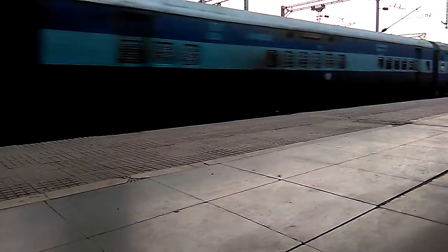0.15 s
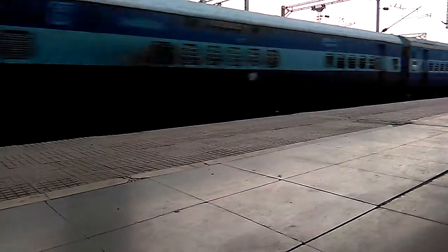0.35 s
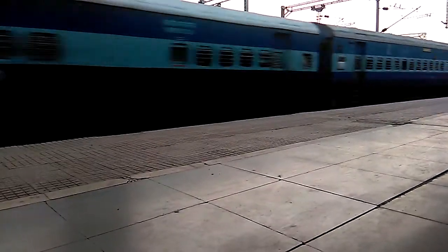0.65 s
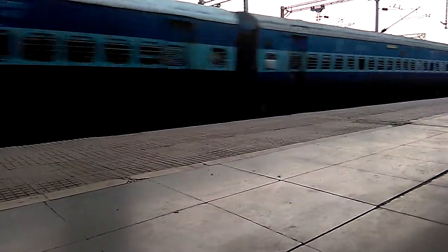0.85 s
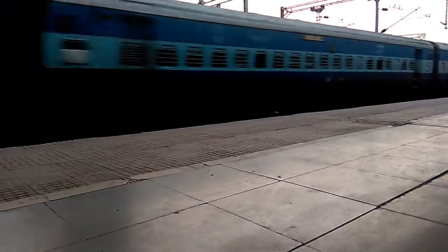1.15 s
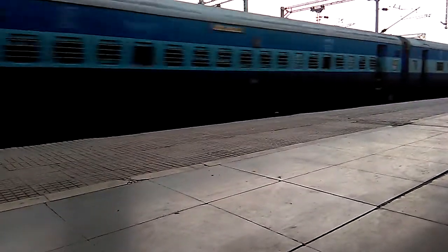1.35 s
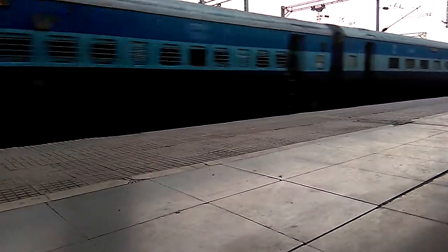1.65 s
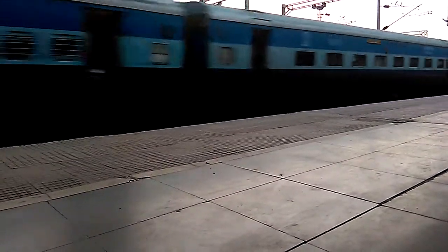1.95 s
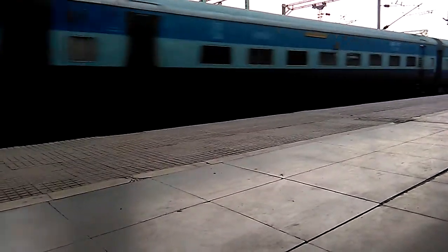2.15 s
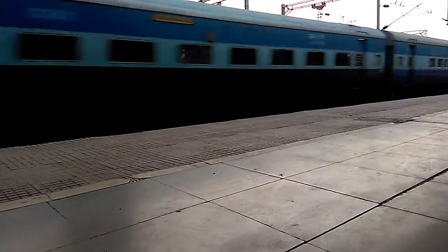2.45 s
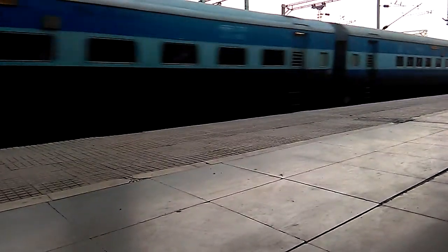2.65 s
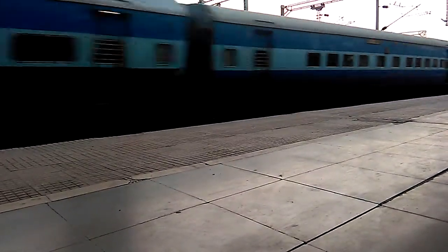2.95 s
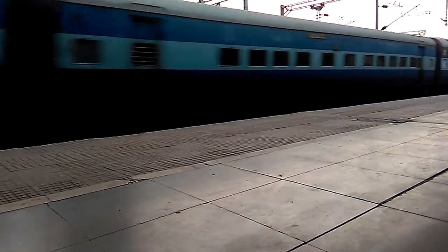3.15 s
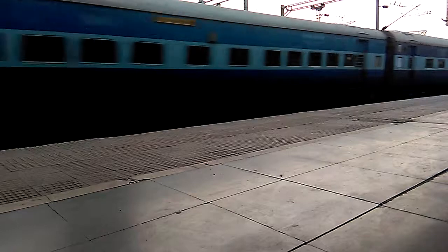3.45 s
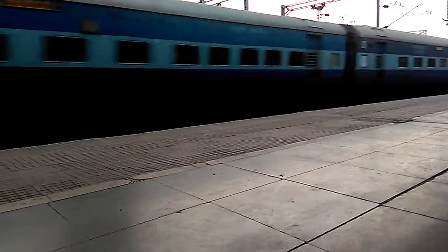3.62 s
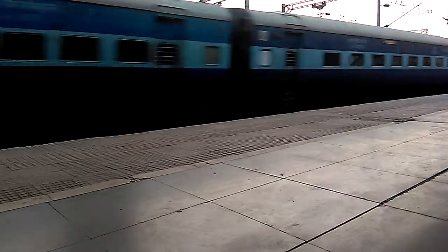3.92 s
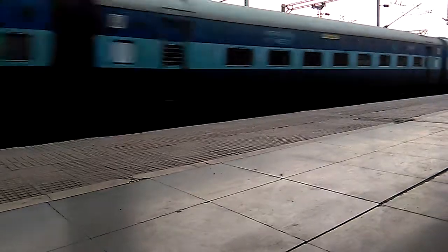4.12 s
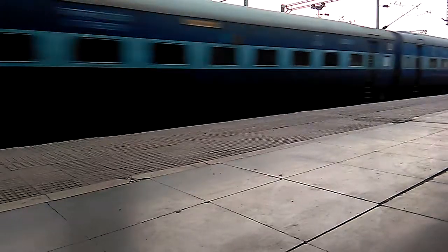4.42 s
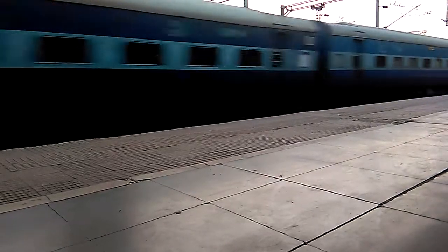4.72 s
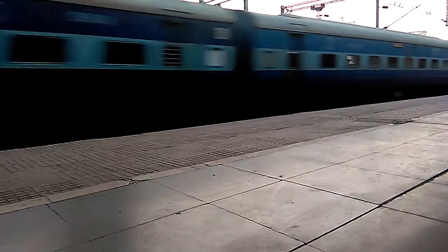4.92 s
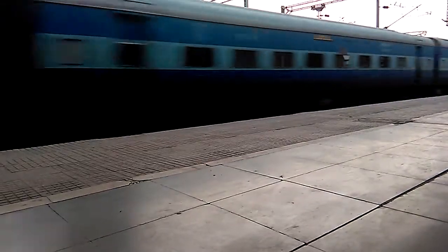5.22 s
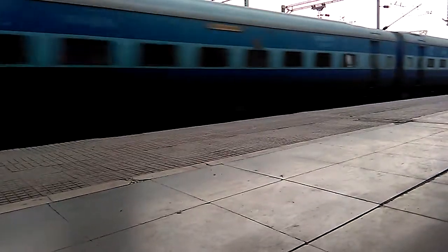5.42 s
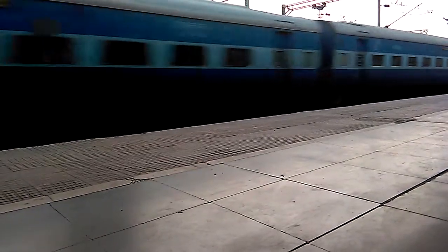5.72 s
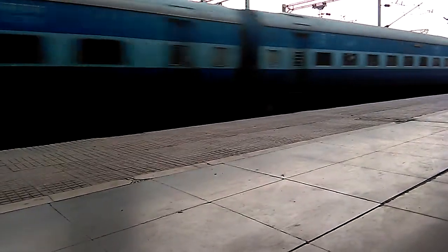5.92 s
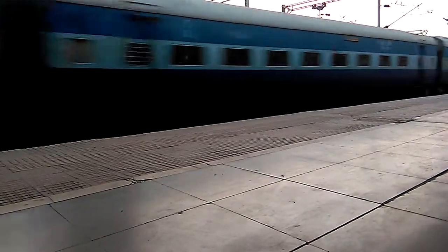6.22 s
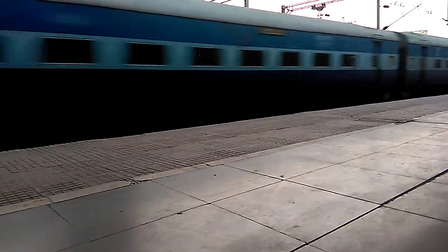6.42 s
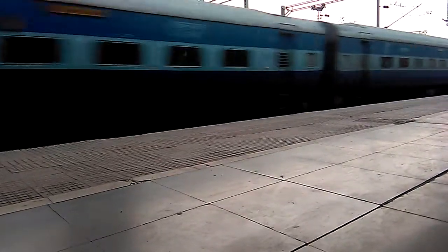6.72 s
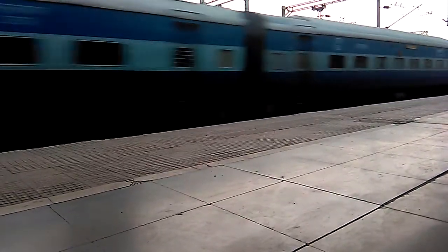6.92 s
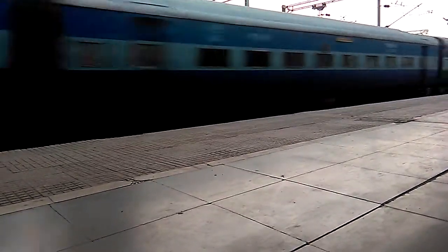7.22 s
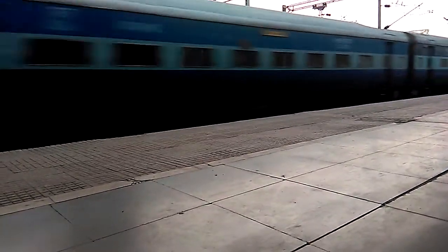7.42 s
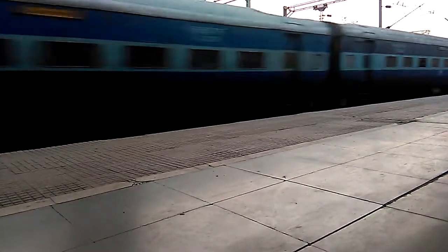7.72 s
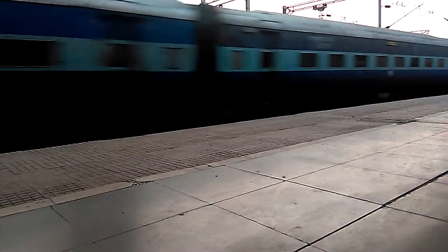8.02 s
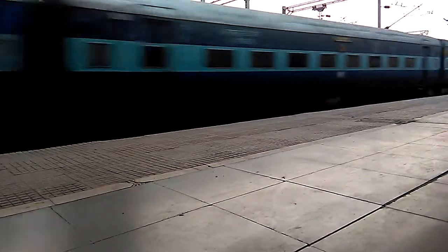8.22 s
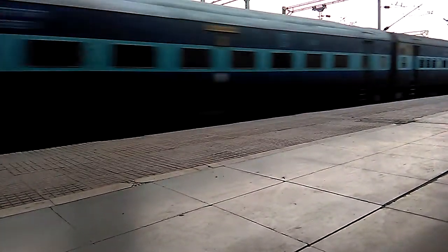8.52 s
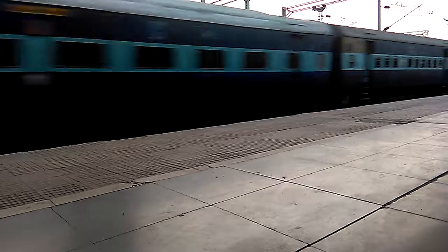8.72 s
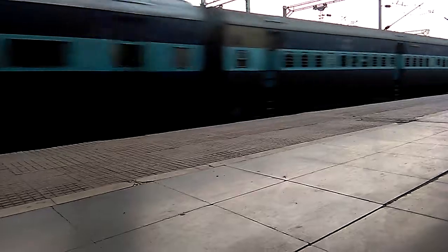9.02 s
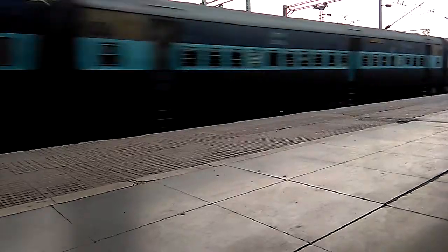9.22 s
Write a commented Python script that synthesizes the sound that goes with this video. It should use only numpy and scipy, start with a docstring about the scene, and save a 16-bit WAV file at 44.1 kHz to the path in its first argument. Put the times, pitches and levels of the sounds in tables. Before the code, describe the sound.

A passenger train is already rushing past a platform at 0 s, heard close and fairly dry, at constant speed. Four wheel blows strike a rail joint in two pairs within about half a second; groups begin near 0.45, 1.45, 2.5, 3.5, 4.5, 5.5, 6.5, 7.5 and 8.55 s. Each blow is a woody, metallic knock with a shudder, bright airy hiss and thin steel ringing. Between groups it falls back to low rumble and fainter hiss. Heavy roaring, clattering bursts hit at 0.6 to 1, 3.6 to 4.1, 4.5 to 4.8, 6.7 to 7.1, 7.7 to 8.1 and 8.7 to 9.1 s, while groups near 1.5, 2.5 and 5.5 s are cleaner. A fluttering mid-pitched wheel hum swells from 3.1 s, peaks near 3.9 and sinks away by 4.4, where rumble stays fuller and loose gear clinks. Rolling continues to the end.

```python
"""Passenger train passing a platform

A train runs past a station platform close to the microphone, one coach a second.
Its wheels cross a rail joint in fours (two bogies of two axles): decaying tones and shaped noise
make each knock, hiss and ring. Loud roaring bursts layer low boom, body and bright clatter noise.
Rolling noise fills the gaps, loose gear knocks, and one wheel hums as a fluttering, sinking sine."""
import sys
import numpy as np
from scipy import signal
from scipy.fft import rfft, irfft, next_fast_len
from scipy.io import wavfile
from scipy.ndimage import uniform_filter1d, map_coordinates

SR = 44100
rng = np.random.default_rng(int(sys.argv[2]) if len(sys.argv) > 2 else 0)


def persist_wave(psi):
    """Save psi, clipped to +-1, as 16-bit WAV."""
    counts = np.round(np.clip(psi, -1, 1) * 32767).astype(np.int16)
    wavfile.write(sys.argv[1], SR, np.atleast_2d(counts).T)


N = 412776


def amp(db):
    """Decibels to gain."""
    return 10 ** (np.asarray(db) / 20)


def unit(x):
    """Scale to rms 1."""
    return x / np.sqrt(np.mean(x ** 2) + 1e-20)


def along(points, hz):
    """Read (frequency, value) points on a log frequency axis."""
    f, v = np.transpose(points)
    return np.interp(np.log(hz + 1), np.log(f), v)


def curves(rows):
    """One value per sample for each column after the time."""
    s, *cols = np.transpose(rows)
    return [np.interp(np.arange(N) / SR, s, c) for c in cols]


def wobble(rate):
    """A smooth random curve, rate knots a second."""
    knots = rng.standard_normal(int(N * rate / SR) + 4)
    return map_coordinates(knots, [np.arange(N) * rate / SR])


def filtered(x, response):
    """x times a response of frequency."""
    m = next_fast_len(N + SR // 2)
    return irfft(rfft(x, m) * response(np.fft.rfftfreq(m, 1 / SR)), m)[..., :N]


def add(track, s, sound):
    """Mix a sound into a track at time s."""
    at = round(s * SR) + np.arange(len(sound))
    inside = (at >= 0) & (at < N)
    track[at[inside]] += sound[inside]


def strike(t, rise, t60):
    """Envelope that swells and then dies away, peak 1."""
    shape = (1 - np.exp(-(t / rise) ** 2)) * amp(-60 * t / t60)
    return shape / shape.max()


# side level of the noise layers, wide only in the treble: frequency_hz, side_level_db (against mid)
WIDTH = [(3700, -90), (4250, -47), (5200, -30), (6000, -12), (7500, -6), (11800, -7), (13000, -15),
         (14200, -12)]


def rush(spectrum, grain_db=0, grain_rate=300, patchy_db=0):
    """Stereo noise, mid rms 1: contacts of uneven force excite short-lived resonances under a broad colour."""
    force = rng.standard_normal((2, N)) * amp(grain_db * wobble(grain_rate))
    z = signal.stft(force, nperseg=512)[2]
    # random patches, smoothed over frequency and then time
    patches = uniform_filter1d(rng.standard_normal(z.shape[1:]), size=2, axis=0)
    patches = uniform_filter1d(patches, size=9, axis=1)
    force = signal.istft(z * amp(patchy_db * unit(patches)), nperseg=512)[1][:, :N]
    mid, side = filtered(force, lambda hz: amp(along(spectrum, hz)))
    side = filtered(side, lambda hz: amp(along(WIDTH, hz)))
    return np.array([mid + side, mid - side]) / np.std(mid)


# four axles around each coupling: first_axle_s, knock_db, hiss_db, earshot_s (time a wheel stays in earshot)
COUPLINGS = [(-.563, -5, -2.5, 0.36), (.451, 1, -1, 0.26), (1.463, 0, -1, 0.35), (2.473, 0.5, -0.5, 0.21),
             (3.486, 2.5, -1, 0.21), (4.497, 0, -0.5, 0.21), (5.508, -0.5, .5, 0.19),
             (6.521, 1.5, .5, 0.22), (7.532, 2.5, -0.5, .2), (8.551, .5, -.5, 0.2)]
# the four axles in order, added to their coupling's levels: knock_db, hiss_db, steel_ring_db
AXLES = [(-23.5, -27.5, -51), (-25.5, -27.5, -39), (-23, -28, -49), (-23, -27.5, -45)]
# wheels that hit harder than their fellows: start_s, extra_knock_db, extra_ring_db, ring_centre_hz
HARD_BLOWS = [(-.06, 2, 12, 9100), (.586, 9, 8, 5800), (.922, 9.5, -9, 5730), (2.61, 3, -1, 9100),
              (3.619, 1.5, 5.5, 5800), (3.968, 1, 17.5, 9100), (4.625, 14, -20, 5800), (5.642, 1, 1, 5800),
              (6.655, 5.5, 4, 9100), (6.987, 10.5, 12, 8900), (7.667, 9, 10.5, 9100),
              (8.008, 7, 14.5, 9000), (8.68, 5, 11, 5740), (9.024, 14, 6, 5800)]
# identical coaches at a steady speed
SPEED_M_PER_S, WHEELBASE_M, BOGIE_GAP_M = 22.0, 2.97, 7.46
HARD_WITHIN_S = 0.04  # an axle this near a hard blow takes its time and extra levels
RING_SPREAD_OCTAVES = 0.46  # how far around its centre a hard blow rings the steel


def wheels():
    """Axle spacing over speed times every joint crossing: start_s, knock_db, hiss_db, mode_dbs, earshot_s."""
    delays = np.array([0, WHEELBASE_M, BOGIE_GAP_M, BOGIE_GAP_M + WHEELBASE_M]) / SPEED_M_PER_S
    mode_hz, mode_db = np.transpose(STEEL)
    rows = []
    for first, group_knock_db, group_hiss_db, earshot in COUPLINGS:
        for s, (knock_db, hiss_db, ring_db) in zip(first + delays, AXLES):
            for at, hard_db, bright_db, centre_hz in HARD_BLOWS:
                if abs(at - s) < HARD_WITHIN_S:
                    octaves = np.log2(mode_hz / centre_hz)
                    share = 1 / (1 + (octaves / RING_SPREAD_OCTAVES) ** 2)
                    s, knock_db, ring_db = at, knock_db + hard_db, ring_db + bright_db * share
            knock_db, hiss_db = knock_db + group_knock_db, hiss_db + group_hiss_db
            rows.append((s, knock_db, hiss_db, ring_db + mode_db, earshot))
    return rows


# rail and sleeper under a blow: pitch_hz, leading_axle_db, trailing_axle_db (against the knock), t60_s
RAIL = [(377.7, -4, -7, 0.09), (537.6, -16.5, -6.5, 0.16), (695, -5, 2, 0.032), (883, -10, -12, 0.058),
        (1157, -27, -14.5, 0.046), (2050, -34, -19.5, 0.042)]
# colour of the shudder, also of rough edges on loose gear: frequency_hz, relative_density_db
KNOCK = [(20, -45), (40, -12.5), (100, -3), (250, -8.5), (380, 7), (580, -5.5), (800, 0.5), (1100, -11),
         (1600, -17), (2200, -13), (3200, -23), (4400, -20), (5500, -49), (9000, -70)]


def clacks(crossings):
    """Each wheel drops into the joint: the rail rings briefly and the track shudders."""
    t = np.arange(SR // 2) / SR
    ring, shudder = np.zeros((2, N))
    for axle, (s, db, *_) in enumerate(crossings):
        for hz, leading_db, trailing_db, t60 in RAIL:
            size, detune, phase = rng.standard_normal(3)
            level_db = db + (trailing_db if axle % 2 else leading_db) + 3.5 * size
            tone = np.sin(2 * np.pi * (hz * (1 + 0.035 * detune) * t + phase))
            # high bending waves travel faster in a rail and arrive first
            lag = 0.025 * (np.sqrt(700 / hz) - 1)
            add(ring, s + lag, amp(level_db) * strike(t, rise=0.0067, t60=t60) * tone)
        # overlapping noise adds as power
        add(shudder, s - 0.01, (amp(db) * strike(t, rise=0.024, t60=0.39)) ** 2)
    return ring + amp(-7.5) * np.sqrt(shudder) * rush(KNOCK, patchy_db=3.5)


# high ringing modes of the wheel steel: pitch_hz, level_db (against the axle's steel ring)
STEEL = [(5819, 3.5), (6573, -3.5), (8366, -9), (9119, 2.5), (11235, -6.5), (12758, -36)]
# colour of the wheel scrubbing on the rail head: frequency_hz, relative_density_db
HISS = [(2000, -70), (4000, -11), (5200, -12.5), (6000, -2.5), (7700, 1.5), (9800, -0.5), (11000, -5.5),
        (12600, -3.5), (13300, -20), (14300, -13)]


def wheel_hiss(crossings):
    """The jolted wheel scrubs on the rail head and its steel modes ring, at new strengths for every blow."""
    t = np.arange(SR // 2) / SR
    scrub, ringing = np.zeros(N), np.zeros((len(STEEL), N))
    for s, _, hiss_db, modes_db, earshot in crossings:
        # the wheel runs out of earshot behind the platform edge
        leaving = np.exp(-(t / earshot) ** 4)
        scrub_shape = strike(t, rise=0.022, t60=1.0) * leaving
        ring_shape = strike(t, rise=0.02, t60=0.36) * leaving
        add(scrub, s - 0.011, (amp(hiss_db - 4.5) * scrub_shape) ** 2)
        for mode, db in zip(ringing, modes_db):
            level_db = db + 1.5 * rng.standard_normal()
            add(mode, s + 0.003, (amp(level_db) * ring_shape) ** 2)
    time = np.arange(N) / SR
    steel = np.zeros(N)
    for mode, (hz, _) in zip(ringing, STEEL):
        # the turning wheel makes each mode beat and waver
        beating = amp(3.5 * wobble(45))
        steel += np.sqrt(mode) * beating * np.sin(2 * np.pi * hz * time + 1.15 * wobble(70))
    hiss = np.sqrt(scrub) * rush(HISS, grain_db=1, grain_rate=400, patchy_db=2.2)
    return hiss + amp(1.5) * steel


def held(t, length, rise, sag_db, t60):
    """Envelope that rises, tilts down by sag_db over its length (up if negative) and then dies away."""
    after = np.maximum(t - length, 0)
    sag = np.minimum(t / length, 1) - 0.5
    return (1 - np.exp(-t / rise)) * amp(-sag_db * sag - 60 * after / t60)


# loud roaring bursts: start_s, length_s, strength_db, boom_db
ROAR_BURSTS = [(-.02, 0.096, -1, -22.5), (0.574, .18, 1, -19), (0.809, 0.11, 2.5, -22.5),
               (0.924, .095, 2.5, -26), (3.63, .11, 1, -21.5), (3.876, 0.039, 2.5, -24.5),
               (3.963, 0.12, 3, -19.5), (4.513, 0.12, 2, -23.5), (4.575, 0.18, 3.5, -19),
               (6.672, 0.082, -2.5, -30.5), (6.889, 0.094, -1, -23.5), (6.979, 0.12, 1.5, -31.5),
               (7.662, 0.12, -0.5, -25), (7.927, 0.048, -1, -19.5), (7.998, 0.1, 0, -30),
               (8.694, .11, -.5, -26.5), (8.922, 0.072, -2, -23.5), (9.003, .12, 1, -25)]
# colours of the three layers, each: frequency_hz, relative_density_db
BOOM = [(20, -44), (40, -40), (60, -11), (95, 0.5), (220, -0.5), (300, -14), (450, -31), (1000, -100)]
BODY = [(40, -60), (150, -45), (270, -1), (370, 0.5), (510, -2.5), (600, -6.5), (760, -5.5), (1000, -13.5),
        (1400, -29.5), (3000, -90)]
CLATTER = [(100, -70), (600, -24), (1100, -0.5), (1500, -4), (1900, -2), (2400, -2.5), (3200, -6.5),
           (3900, -6), (4350, -3.5), (5000, -8), (6500, -10.5), (8000, -25), (11000, -31.5), (14000, -39)]
BODY_DB, CLATTER_DB = -17, -21.5  # at strength 0
CLATTER_GROWS = 0.26  # dB per dB of strength: louder bursts are deeper


def roar_bursts():
    """Loud roaring bursts: boom and body rise fast, the bright clatter more slowly."""
    t = np.arange(SR // 2) / SR
    boom, body, clatter = np.zeros((3, N))
    for s, length, db, boom_db in ROAR_BURSTS:
        boom_shape = held(t, length, rise=0.01, sag_db=-1.0, t60=0.22)
        body_shape = held(t, length, rise=0.01, sag_db=4.0, t60=0.2)
        clatter_shape = held(t, length, rise=0.025, sag_db=7, t60=0.22)
        add(boom, s, (amp(boom_db) * boom_shape) ** 2)
        add(body, s, (amp(db) * body_shape) ** 2)
        add(clatter, s - 0.003, (amp(CLATTER_GROWS * db) * clatter_shape) ** 2)
    boom_noise = rush(BOOM, patchy_db=4.5)
    body_noise = rush(BODY, grain_db=0.85, grain_rate=220, patchy_db=3.0)
    clatter_noise = rush(CLATTER, grain_db=1.5, grain_rate=350, patchy_db=2.7)
    return (np.sqrt(boom) * boom_noise
            + amp(BODY_DB) * np.sqrt(body) * body_noise
            + amp(CLATTER_DB) * np.sqrt(clatter) * clatter_noise)


# the humming wheel swells, comes closest, then fades and sinks in pitch
HUM_START_S, HUM_CLOSEST_S, HUM_END_S = 3.08, 3.92, 4.38
HUM_HZ, HUM_SAG_HZ_PER_S = 515, 45
HUM_DB, HUM_SWELL_DB_PER_S, HUM_FADE_DB_PER_S = -25.5, 26.5, 44


def hum():
    """One wheel sings on an unsteady, fluttering note that sinks once it has come closest."""
    t = np.arange(N) / SR
    before, after = np.maximum(HUM_CLOSEST_S - t, 0), np.maximum(t - HUM_CLOSEST_S, 0)
    sounding = 1.0 * ((t > HUM_START_S) & (t < HUM_END_S))
    sounding = uniform_filter1d(sounding, size=SR // 20)  # soft ends
    hz = HUM_HZ - HUM_SAG_HZ_PER_S * after
    db = HUM_DB - HUM_SWELL_DB_PER_S * before - HUM_FADE_DB_PER_S * after
    phase = 2 * np.pi * np.cumsum(hz + 15 * wobble(70)) / SR
    return sounding * amp(db + 3.5 * wobble(40)) * unit(np.sin(phase))


# knocks and clinks of loose running gear: start_s, pitch_hz, level_db
BUMPS = [(.405, 150, -25), (1.385, 290, -33), (2.389, 330, -32), (3.2, 420, -35), (4.21, 2150, -37),
         (4.275, 1820, -33), (4.329, 490, -25), (4.37, 220, -28), (4.405, 1850, -36)]


def bumps():
    """Loose running gear knocks: each blow is one short note with a rough edge of noise."""
    t = np.arange(SR // 4) / SR
    notes, edge = np.zeros((2, N))
    for s, hz, db in BUMPS:
        shape = amp(db) * strike(t, rise=0.0024, t60=0.12)
        add(notes, s, shape * np.sin(2 * np.pi * hz * t))
        add(edge, s, shape)
    return notes + amp(-12) * edge * rush(KNOCK, patchy_db=9)


# swell of the rolling noise near the bogies: centre after the first axle, half length
NEAR_DELAY_S, NEAR_HALF_S = 0.27, 0.33


def nearness():
    """Rises from 0 to about 1 while the bogies of each coupling go by."""
    t = np.arange(N) / SR
    return sum(np.exp(-((t - s - NEAR_DELAY_S) / NEAR_HALF_S) ** 4) for s, *_ in COUPLINGS)


# the treads start to hiss just before the first axle reaches the joint
TREAD_LEAD_S, TREAD_RISE_S, TREAD_HOLD_S = 0.1, 0.033, 0.735
TREAD_DB, TREAD_FADE_DB_PER_S = -50, 150


def tread_gain():
    """Attack, hold and release of the tread hiss, once for each coupling."""
    t = np.arange(SR) / SR
    fade_db = TREAD_FADE_DB_PER_S * np.maximum(t - TREAD_HOLD_S, 0)
    shape = (1 - np.exp(-t / TREAD_RISE_S)) * amp(TREAD_DB - fade_db)
    gain = np.zeros(N)
    for s, *_ in COUPLINGS:
        add(gain, s - TREAD_LEAD_S, shape)
    return gain


# base levels as the middle of each coach goes by: middle_s, rumble_db, rail_roar_db, far_hiss_db
COACHES = [(.28, -40.5, -51, -52.5), (1.29, -38.5, -49, -52), (2.3, -43.5, -55, -82),
           (3.31, -43, -55.5, -67), (4.33, -34, -42.5, -44.5), (5.34, -42.5, -54.5, -62),
           (6.35, -47, -55, -98), (7.36, -43, -56, -48), (8.37, -43, -54.5, -61.5), (9.34, -42, -51, -77)]
# colours of the rolling layers, each: frequency_hz, relative_density_db
RUMBLE = [(20, -52), (45, -16), (90, -3.5), (160, 1.5), (240, -1), (370, 3), (520, -3), (650, -5),
          (850, -7.5), (1200, -15.5), (2500, -67), (6000, -90)]
ROAR = [(100, -40), (400, -24), (900, -7), (1400, 6.5), (2050, 4), (2600, 2), (4300, -3.5), (5000, -9.5),
        (7500, -7), (11000, -18), (14000, -40)]
THIN_HISS = [(2000, -70), (5000, -17), (6000, -1), (7700, -0.5), (10000, -1.5), (11000, -8), (12500, -10.5),
             (14200, -20)]
# hiss between the bogies, duller for its distance: frequency_hz, relative_density_db
FAR_HISS = [(2000, -60), (5000, -14), (6200, -1.5), (7700, 1), (9800, -2), (11200, -9), (12500, -12),
            (14200, -24)]
NEAR_RUMBLE_DB, NEAR_ROAR_DB = 5, 5  # rise near the bogies
HISS_WAVER_DB = 2.5  # random waver of the far hiss


def rolling():
    """Rough treads on the rail rumble, roar and hiss thinly near the bogies, with a duller hiss between."""
    rumble_db, roar_db, far_db = curves(COACHES)
    near = nearness()
    rumble = rush(RUMBLE, grain_db=1.8, grain_rate=35, patchy_db=3.0)
    roar = rush(ROAR, grain_db=2.5, grain_rate=36, patchy_db=3.0)
    tread_hiss = rush(THIN_HISS, patchy_db=1.5)
    far_hiss = rush(FAR_HISS, patchy_db=3)
    return (amp(rumble_db + NEAR_RUMBLE_DB * near) * rumble
            + amp(roar_db + NEAR_ROAR_DB * near) * roar
            + tread_gain() * tread_hiss
            + amp(far_db + HISS_WAVER_DB * wobble(12)) * far_hiss)


def scene():
    """All sounds of the passing train."""
    crossings = wheels()
    joint = clacks(crossings) + wheel_hiss(crossings)
    return joint + roar_bursts() + hum() + bumps() + rolling()


TOP_HZ = 14270  # band limit of the recorder


def record(dry):
    """The recorder rounds off the highest peaks and keeps nothing above its band limit."""
    rounded = dry / (1 + np.abs(dry / 0.9) ** 6) ** (1 / 6)
    return filtered(rounded, lambda hz: hz < TOP_HZ)


dry = scene()
out = record(dry)
persist_wave(out)
```